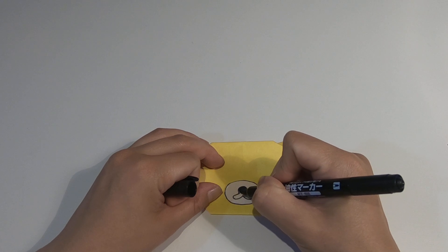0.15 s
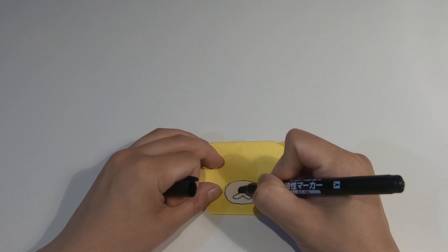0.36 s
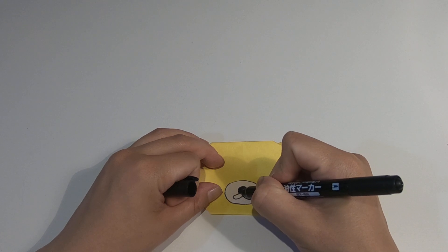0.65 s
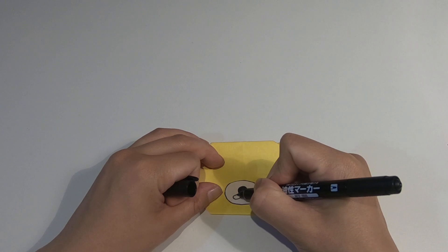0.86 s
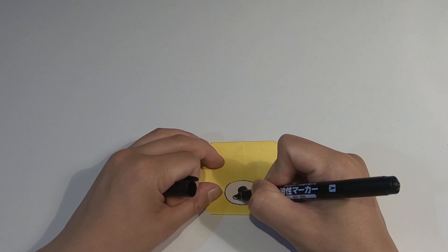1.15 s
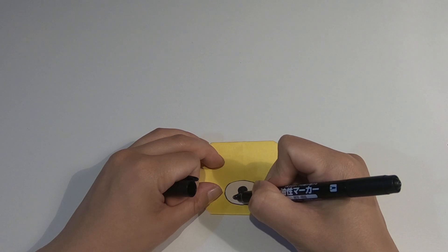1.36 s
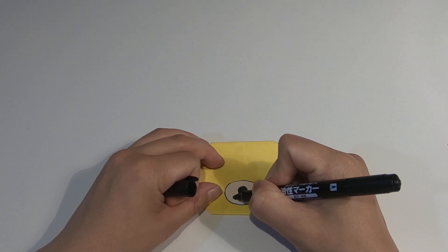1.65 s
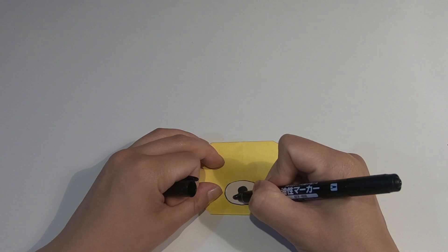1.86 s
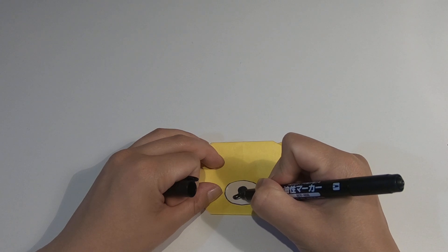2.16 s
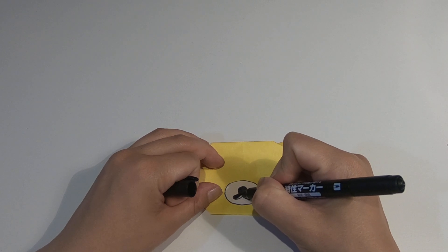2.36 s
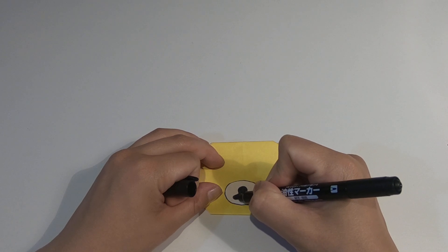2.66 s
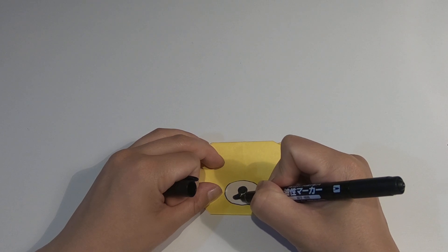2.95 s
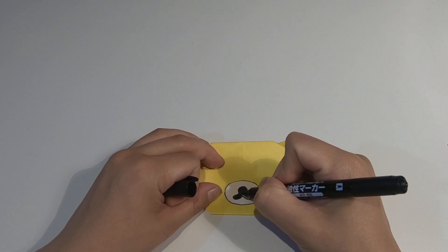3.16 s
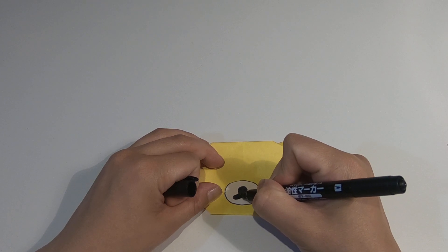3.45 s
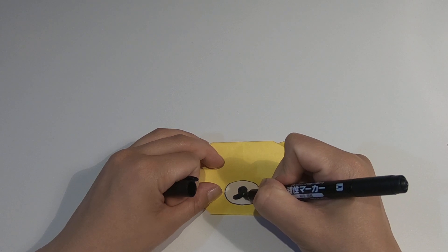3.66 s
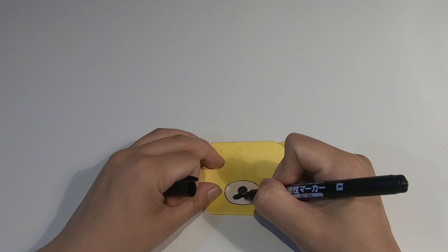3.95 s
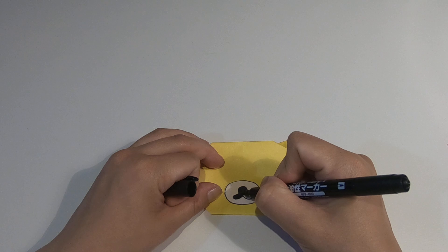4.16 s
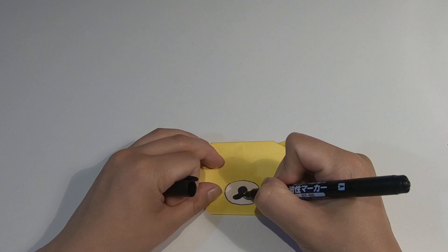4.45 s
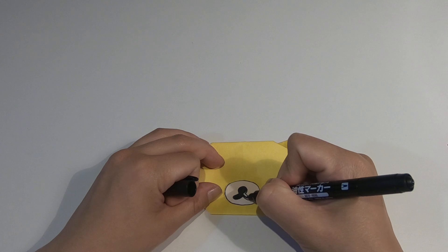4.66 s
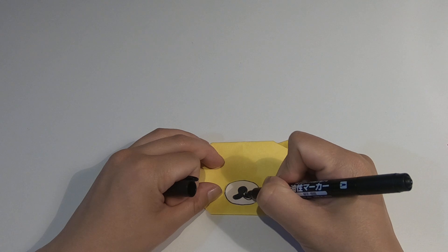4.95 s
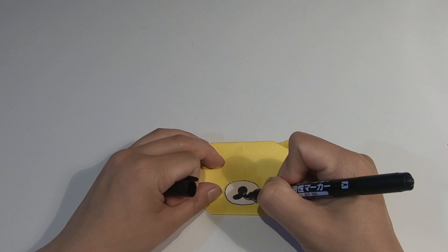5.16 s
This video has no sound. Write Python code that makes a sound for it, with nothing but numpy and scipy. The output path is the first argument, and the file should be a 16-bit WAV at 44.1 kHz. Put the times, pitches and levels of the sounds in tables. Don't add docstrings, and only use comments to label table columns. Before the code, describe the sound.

A quiet room with soft air noise, faint hiss and a low, wavering hum around 150-250 Hz, heard by a small stereo microphone close to a table. From 0 to 0.4 s a felt tip makes several dry, mid-bright scratches on paper. At about 0.75-0.9 s a cluster of tiny crisp ticks lands, over a deep juddering hand drag that lasts to about 1.15 s. A strong, muffled, low thump comes at 1.42 s, with more rubbing around it. A faint stroke follows near 1.9 s, a softer bump at 2.08 s, and the strongest thump at 2.35 s. Quick papery scribbles run from 2.15 to 3.0 s, with a short higher bump at 2.8 s, then fade into light, buzzy strokes until 3.7 s. Near-stillness lasts until 4.4 s. Faint strokes, low drags and barely audible bumps close it by 5.3 s. Thumps and rumble lean right.

```python
import sys
import numpy as np
from scipy import signal
from scipy.fft import rfft, irfft, next_fast_len
from scipy.io import wavfile
from scipy.ndimage import uniform_filter1d

SR = 44100
rng = np.random.default_rng(int(sys.argv[2]) if len(sys.argv) > 2 else 0)


def generate_wav(sig):
    pcm = np.round(np.clip(np.atleast_2d(sig).T, -1, 1) * 32767).astype(np.int16)
    wavfile.write(sys.argv[1], SR, pcm)


def linear_from_db(decibels):
    return 10 ** (np.asarray(decibels, float) / 20)


N = 233431
SIZE = next_fast_len(N + 8192)
HZ, T = np.fft.rfftfreq(SIZE, 1 / SR), np.arange(N) / SR

# [f/Hz, width/Hz, level/dB]
SWAY_MODES = [(29, 64, -9), (46.6, 7.7, -4), (61.3, 4.1, -9.5)]
REST_DB = -76.5


def evened(x):
    return x / np.sqrt(np.mean(x ** 2) + 1e-20)


def read(points, hz):
    f, value = np.transpose(points)
    return np.interp(np.log(hz + 1), np.log(f + 1), value)


def shade(x, gain):
    return irfft(rfft(x, SIZE) * gain, SIZE)[..., :N]


def humps(modes):
    power = sum(linear_from_db(2 * db) / (1 + (2 * (HZ - hz) / width) ** 2) ** 2 for hz, width, db in modes)
    return np.sqrt(power)


def rings(modes):
    return sum((-1) ** k * linear_from_db(db) / (1 + 2j * (HZ - hz) / width) ** 2
               for k, (hz, width, db) in enumerate(modes))


def slips(per_s, spread_db):
    size = linear_from_db(spread_db * np.minimum(rng.exponential(1, N), 4))
    sign = rng.choice([-1., 1.], N)
    return size * sign * (rng.random(N) < per_s / SR)


def slow(size):
    once = uniform_filter1d(rng.standard_normal(N), size)
    return evened(uniform_filter1d(once, size))


def ports(mid, side):
    return np.array([mid + side, mid - side])


def arches(rows, skew, power):
    u = np.array([np.clip((T - row[0]) / row[1], 0, 1) for row in rows])
    peak = np.array([linear_from_db(2 * row[2]) for row in rows])[:, None]
    return u, peak * np.abs(np.sin(np.pi * u ** skew)) ** (2 * power)


def strokes():
    # [t/s, length/s, scratch level/dB, bright level/dB, table buzz level/dB]
    scribbles = [(2.148, .12, -70.5, 8.5, -0.5), (2.281, 0.097, -60, 4, -3), (2.392, 0.11, -61, 4.5, -2),
                 (2.504, 0.078, -58, 2, -5), (2.601, 0.097, -65.5, 2.5, 1), (2.714, .05, -68.5, -5, -5),
                 (2.736, 0.062, -61.5, -0.5, -7), (2.827, 0.1, -73.5, 6, 6.5), (2.96, .12, -60, 0, -4),
                 (3.048, .1, -77, 0, 10), (3.175, .11, -76, 8.5, 8), (3.288, 0.11, -76, 6, 8.5),
                 (3.393, 0.098, -74, 4, 7), (3.481, 0.092, -81, 12.5, 9.5), (3.602, 0.095, -75, -1, -1)]
    # [t/s, length/s, scratch level/dB, bright level/dB, table buzz level/dB]
    sweeps = [(-.06, 0.26, -66, -3.5, -5), (0.089, 0.11, -59, -3.5, 2.5), (.12, 0.16, -54, -5, -6.5),
              (.2, 0.13, -57, -2.5, -8), (.27, 0.11, -62.5, -3, -4.5), (.63, 0.15, -77, -18, -1),
              (0.738, .12, -69.5, 1, 5.5), (.82, 0.25, -76, -5, 2), (0.979, 0.23, -79, 0.5, 5.5),
              (1.165, 0.085, -73, -7, 6), (1.83, 0.34, -74, -1, -3), (1.92, .17, -66.5, 0, -4),
              (4.44, 0.14, -74.5, -4, 0), (4.55, 0.22, -74, 0, 5.5), (4.67, 0.17, -71, -0.5, 5),
              (4.87, 0.2, -73, 10, 5.5), (4.95, 0.082, -65.5, -2.5, -3), (5.07, 0.11, -70.5, -1, 4.5),
              (5.18, 0.13, -75, 8.5, 6)]
    dulling_db, digging_db = -2.5, 12.5
    linger_db, linger_s = -19.5, 0.021

    rows = np.array(scribbles + sweeps)
    quick = arches(scribbles, skew=0.85, power=1.37)
    slower = arches(sweeps, skew=0.71, power=2)
    u, power = (np.concatenate(pair) for pair in zip(quick, slower))
    keep = np.exp(-1 / (linger_s * SR))
    power = power + linear_from_db(linger_db) * signal.lfilter([1 - keep], [1, -keep], power)
    total = power.sum(axis=0) + 1e-14
    bright = (power * (rows[:, 3:4] - dulling_db * (u - .5))).sum(axis=0) / total
    buzz = (power * (rows[:, 4:5] + digging_db * (u - .5))).sum(axis=0) / total
    return 10 * np.log10(total), bright, buzz


def marker():
    # [f/Hz, level per Hz/dB]
    paper = [(880, -9), (1500, -12), (1860, -9), (2030, -5.5), (2200, -7.5), (2330, -4), (2730, -0.5),
             (3510, 7.5), (3880, 1.5), (5100, -5), (5650, -7), (7320, -9.5), (8390, -36), (10900, -40),
             (18500, -120)]
    # [f/Hz, width/Hz, level/dB]
    paper_modes = [(2410, 51, -7), (3520, 120, -14), (4310, 430, -4.5), (5550, 67, 7.5), (5900, 96, 3.5),
                   (6415, 80, 4.5), (7950, 82, -7)]
    # [f/Hz, level/dB]
    paper_side = [(60, 22), (100, -2), (180, -4), (310, 8), (530, 17.5), (910, -11), (1560, -8), (2680, -4),
                  (4610, -11.5), (7940, 6.5)]
    # [f/Hz, level/dB]
    paper_balance = [(1500, -4.5), (2700, 1), (4600, -4), (8000, -3)]
    # [f/Hz, level per Hz/dB]
    fizz_colour = [(7500, -21), (8600, -5), (10500, -12), (12500, 1), (15000, -9)]
    # [f/Hz, width/Hz, level/dB]
    buzz_modes = [(765, 280, -0.5), (885, 24, 5.5), (1106, 190, -1), (1380, 290, -6.5), (1680, 850, -7)]
    patchy_db = 1.5

    scratch_db, bright_db, buzz_db = strokes()
    bright_db = bright_db + patchy_db * slow(size=500)
    buzz_db = buzz_db + patchy_db * slow(size=700)

    fibres = np.array([slips(9000, 2.72), slips(7400, 0.91)])
    clumps = evened(uniform_filter1d(rng.standard_normal(N), size=350))
    fibres = fibres * linear_from_db(0.87 * clumps)

    colour = linear_from_db(read(paper, HZ)) * (1 + humps(paper_modes))
    bright = 1 / (1 + (4500 / (HZ + 1)) ** 12)
    tilt = np.array([HZ * 0 + 1, linear_from_db(read(paper_side, HZ))])
    dull_part = shade(fibres, colour * tilt * (1 - bright))
    bright_part = shade(fibres, colour * tilt * bright)
    scratch = dull_part / dull_part[0].std() + bright_part / bright_part[0].std() * linear_from_db(bright_db)

    fizz = evened(shade(fibres, linear_from_db(read(fizz_colour, HZ))))
    scratch += fizz * linear_from_db(2.0 * bright_db - 38.5)
    whisk = shade(fibres, tilt * humps([(7030, 830, 0)]))
    scratch += whisk / whisk[0].std() * linear_from_db(1.93 * bright_db - 22.5)
    rasp = shade(fibres, tilt * humps([(1900, 1100, 0.0041), (2410, 240, 0.0042)]))
    scratch += rasp / rasp[0].std() * linear_from_db(-.6 * bright_db + .3 * buzz_db - 19.5)

    lean = linear_from_db(read(paper_balance, HZ) / 2)
    scratch = shade(ports(*(scratch * linear_from_db(scratch_db))), np.array([lean, 1 / lean]))
    buzz = [evened(shade(slips(2500, 1.7), humps(buzz_modes))) for port in range(2)]
    level = linear_from_db(scratch_db + buzz_db)
    return scratch + ports(linear_from_db(-2.5) * buzz[0] * level, linear_from_db(5) * buzz[1] * level)


def drags():
    # [t/s, length/s, drag level/dB, upper judder level/dB]
    hand_drags = [(0.0, 0.11, -54.5, -23), (0.213, 0.11, -53.5, -27), (0.618, 0.11, -63, -15),
                  (0.748, 0.15, -49, -8.5), (0.827, 0.35, -42.5, -5.5), (1.06, 0.054, -40.5, 0),
                  (1.103, 0.06, -51.5, -4), (1.286, 0.21, -55, -13), (1.375, 0.12, -51, 8),
                  (1.797, 0.19, -63.5, -3), (2.298, 0.14, -60.5, 12), (2.466, 0.086, -62, -18.5),
                  (2.58, 0.12, -58, -16), (2.723, .2, -57.5, -27), (3.422, 0.16, -60, -8),
                  (4.428, 0.17, -55, -1), (4.56, 0.089, -58.5, 8), (4.62, 0.077, -57, 6.5),
                  (4.67, .12, -54, -5), (4.88, 0.17, -46.5, -12), (5.003, .08, -62, -10)]
    rest_upper_db, tremble_db = -7.5, 6.5

    rows = np.array(hand_drags)
    power = arches(rows, skew=1, power=0.95)[1]
    rest = linear_from_db(2 * (REST_DB + tremble_db * slow(size=3000)))
    total = power.sum(axis=0) + rest
    upper_db = ((power * rows[:, 3:4]).sum(axis=0) + rest * rest_upper_db) / total
    return 10 * np.log10(total), upper_db


def judder(per_s, wobble, spread_db):
    drift = evened(uniform_filter1d(rng.standard_normal(N), size=1500))
    pace = per_s * (1 + wobble * drift)
    slip = np.diff(np.floor(np.cumsum(np.abs(pace)) / SR), prepend=0)
    return slip * linear_from_db(spread_db * rng.standard_normal(N))


def stand():
    # [f/Hz, width/Hz, level/dB]
    drag_modes = [(86, 19, -0.5), (102.3, 27, 9), (197, 108, -2.5), (445, 37, -18)]
    # [f/Hz, width/Hz, level/dB]
    hum_modes = [(157, 43, 0), (208.6, 74, -0.5), (242, 22, -13)]
    hum_base_db, hum_swell_db, hum_push = -62, 2.5, 0.1
    centre_hz, wander_hz, lowest_hz, width_hz = 184, 20, 155, 70

    drag_db, upper_db = drags()
    hum_db = hum_base_db + hum_push * (drag_db - REST_DB) + hum_swell_db * slow(size=2500)

    right_jolts = judder(per_s=51, wobble=.12, spread_db=2.7) + 0.24 * slips(500, 1.3)
    jolts = np.array([right_jolts, 0.46 * slips(570, 2.46)])
    sway = evened(shade(jolts, rings(SWAY_MODES) / (1 + 34 / (1j * HZ + 1)) ** 2))
    upper = evened(shade(jolts, rings(drag_modes)))
    drag = sway + upper * linear_from_db(np.minimum(upper_db, 7))
    right, own = drag * linear_from_db(drag_db)

    hum_hz = np.maximum(centre_hz + wander_hz * slow(size=5000), lowest_hz)
    turning = np.exp(2j * np.pi * np.cumsum(hum_hz) / SR)
    r = np.exp(-np.pi * width_hz / SR)
    side = rng.standard_normal(N) / turning
    for stage in range(2):
        side = signal.lfilter([1 - r], [1, -r], side)
    stiff = 1 / (1 + (128 / (HZ + 1)) ** 10)
    mid = evened(shade(rng.standard_normal(N), stiff * humps(hum_modes)))
    side = evened(shade((side * turning).real, stiff))

    shake = linear_from_db(4.5) * np.array([-.08 * right + 0.14 * own, right])
    return shake + linear_from_db(hum_db) * ports(mid, linear_from_db(4.5) * side)


def room():
    # [f/Hz, level per Hz/dB]
    room_sum = [(160, -36), (270, -10), (410, -10), (440, -14.5), (480, -16), (523, -18), (841, -11.5),
                (930, -20.5), (1330, -20.5), (3160, -29), (3640, -23.5), (5220, -28), (6380, -20),
                (8390, -34), (10900, -45.5), (18500, -120)]
    # [f/Hz, level per Hz/dB]
    room_side = [(160, -27), (270, 1.5), (286, -17), (321, -5.5), (460, -14), (613, 0), (678, -11.5),
                 (728, 1.5), (1010, -6.5), (1140, -16.5), (1350, -14), (3200, -32), (6380, -21),
                 (8390, -32), (10900, -50), (18500, -120)]
    # [f/Hz, level per Hz/dB]
    hiss_colour = [(7000, -32), (8300, -39.5), (10000, -1.5), (12500, 1.5), (14000, -8), (15500, -19)]
    sum_db, side_db, sway_db, hiss_db, patch_db = -69.5, -62, -71.5, -91, 1.0

    frames, hz = N // 256 + 5, np.fft.rfftfreq(1024, 1 / SR)
    a, b, patches = rng.standard_normal((frames, 513, 2, 3)).T
    patches = uniform_filter1d(patches[0], 10, 0)
    patches = evened(uniform_filter1d(patches, 14, 1))
    colours = np.array([read(room_sum, hz), read(room_side, hz)])[..., None]
    z = (a + 1j * b) * linear_from_db(colours + patch_db * patches)
    mid, side = signal.istft(z, nperseg=1024, noverlap=768)[1][:, :N]
    air = ports(linear_from_db(sum_db) * evened(mid), linear_from_db(side_db) * evened(side))
    sway = shade(rng.standard_normal((2, N)), humps(SWAY_MODES))
    hiss = shade(rng.standard_normal((2, N)), linear_from_db(read(hiss_colour, HZ)))
    return air + linear_from_db(sway_db) * evened(sway) + linear_from_db(hiss_db) * evened(hiss)


def ticks():
    # [t/s, peak level/dB, f/Hz]
    snaps = [
        (0.7465, -48, 4900),
        (0.752, -56, 5200),
        (.770, -59, 4230),
        (.7748, -53, 6000),
        (0.7804, -48, 3840),
        (.789, -55, 5000),
        (0.8025, -53, 3870),
        (0.814, -54, 4060),
        (.846, -57, 3600),
        (.885, -58, 3900),
    ]
    snap_t60, snap_noise = .004, .9
    thud_hz, thud_db, thud_t60 = 845, -5, 0.057

    snap, thud, t = np.zeros(N), np.zeros(N), np.arange(2000) / SR
    for s, db, hz in snaps:
        start = round(s * SR)
        ring = np.sin(2 * np.pi * hz * t) + snap_noise * rng.standard_normal(len(t))
        snap[start:][:len(t)] += linear_from_db(db - 60 * t / snap_t60) * ring
        thud[start:][:len(t)] += linear_from_db(db + thud_db - 60 * t / thud_t60) * np.sin(2 * np.pi * thud_hz * t)
    snap = signal.sosfilt(signal.butter(N=8, Wn=7600, fs=SR, output="sos"), snap)
    return np.array([0.99 * snap + 1.5 * thud, 1.5 * snap - .3 * thud])


def bumps():
    # [t/s, level/dB, f/Hz, contact/s, rebound level/dB, overtones level/dB]
    blows = [
        (1.424, -11, 184, 0.029, -5.5, -22),
        (2.0831, -26.5, 201, 0.023, -3, -23.5),
        (2.348, -10.5, 215.3, 0.029, -6.5, -24.5),
        (2.689, -35, 73, 0.022, -31, -22),
        (2.7951, -22.5, 239, 0.0146, -1, -14),
        (4.548, -39, 185, 0.023, -17, -32),
        (4.65, -34.5, 168, 0.017, -12, -40),
        (5.14, -41.5, 192, 0.0225, 0, -28),
    ]
    # [f/Hz, level/dB, t60/s]
    rebound = [(168, -5.5, 0.16), (212, -2.5, 0.097), (285, -6, 0.078)]
    overtone_hz = [300, 412, 560, 700, 815, 960, 1150, 1350, 1530]
    # [level/dB, rise/s, t60/s]
    overtones = [(8, 0.0057, .08), (2, 0.0091, 0.15), (-14, 0.0041, 0.077), (-3.5, 0.0091, 0.073),
                 (-1.5, 0.0079, 0.065), (-15, .008, 0.086), (1.5, 0.0042, 0.059), (6, 0.0045, 0.035),
                 (-19.5, 0.0025, 0.13)]
    # [f/Hz, width/Hz, level/dB]
    rattle_modes = [(475, 74, 7.5), (740, 410, -2)]
    rattle_db, flat_hz, tight_db_per_hz = -15, 184, .35
    left_shake = -0.19

    shake, knock, loose = np.zeros(N + SR), np.zeros(N + SR), np.zeros(N + SR)
    t = np.arange(SR // 4) / SR
    rattle = evened(shade(slips(3000, 2.5), humps(rattle_modes)))
    for s, db, hz, contact, rebound_db, over_db in blows:
        at = slice(round(s * SR), round(s * SR) + len(t))
        u = np.clip(t / contact, 0, 1)
        press = np.sin(np.pi * u ** 1.32) ** 1.2 * np.cos(2 * np.pi * hz * (t - 0.527 * contact))
        free = np.maximum(t - 0.66 * contact, 0)
        ring = sum(linear_from_db(d - 60 * free / t60) * np.sin(2 * np.pi * f * free) for f, d, t60 in rebound)
        shake[at] += linear_from_db(db) * (press + linear_from_db(rebound_db) * (1 - np.exp(-free / 0.0079)) * ring)

        loose_db = db + over_db + rattle_db - tight_db_per_hz * abs(hz - flat_hz)
        loose[at] += linear_from_db(loose_db) * np.sin(np.pi * np.clip(t / (1.62 * contact), 0, 1))

        for f, (d, rise, t60) in zip(overtone_hz, overtones):
            swell = linear_from_db(d - 60 * t / t60) * (1 - np.exp(-t / rise)) ** 2
            tone = np.sin(2 * np.pi * (f * t + rng.random()))
            knock[at] += linear_from_db(db + over_db) * swell * tone
    blow = np.array([left_shake * shake - 0.64 * knock, shake + knock])[:, :N]
    return blow + np.array([[-.3], [1.1]]) * rattle * loose[:N]


def scene():
    return marker() + stand() + room() + ticks() + bumps()


def top_cut(x):
    return signal.sosfilt(signal.butter(12, 15100, fs=SR, output="sos"), x)


def record(dry):
    return top_cut(dry)


dry = scene()
out = record(dry)
generate_wav(out)
```